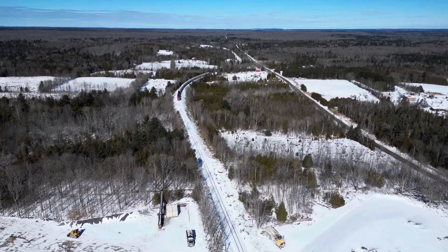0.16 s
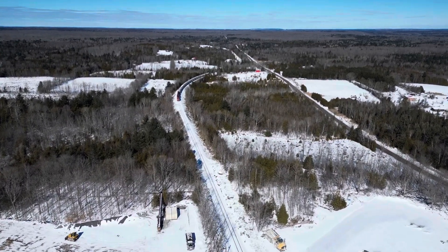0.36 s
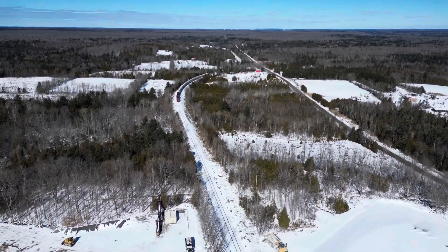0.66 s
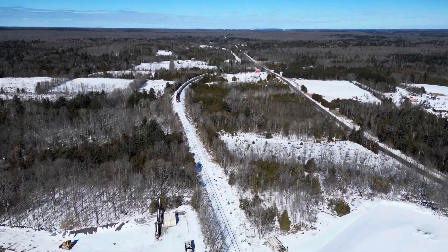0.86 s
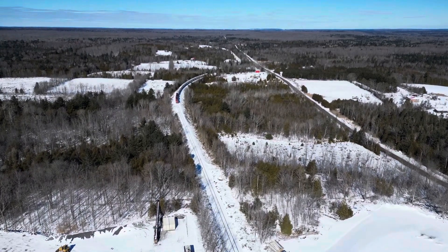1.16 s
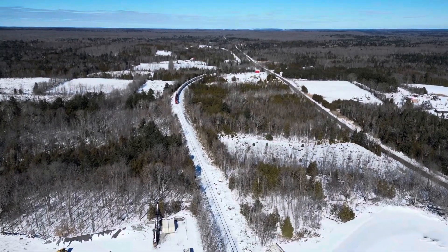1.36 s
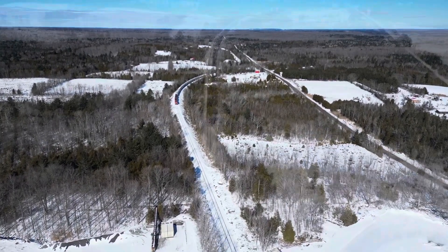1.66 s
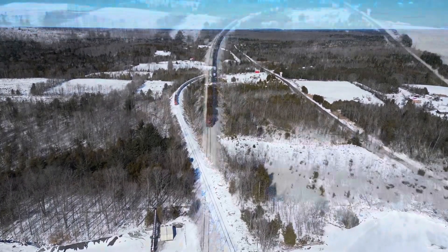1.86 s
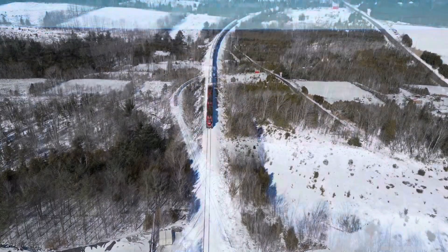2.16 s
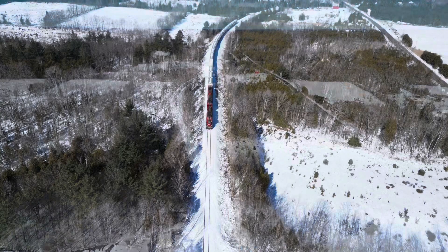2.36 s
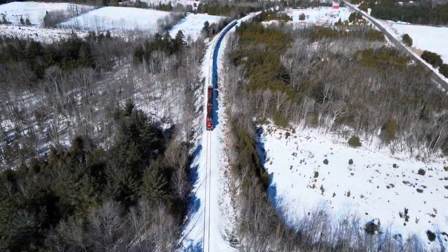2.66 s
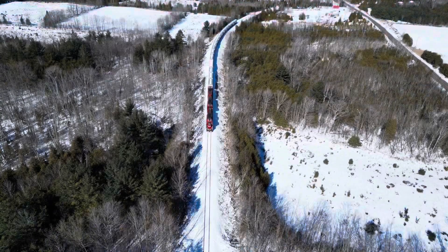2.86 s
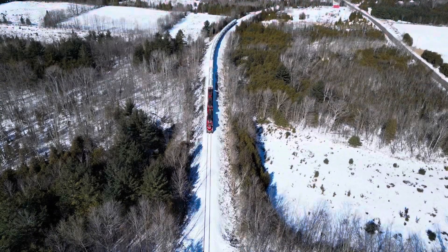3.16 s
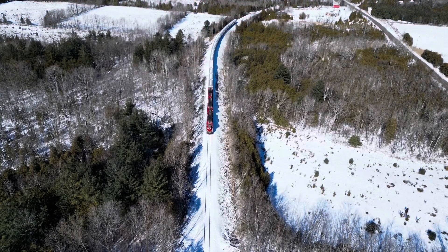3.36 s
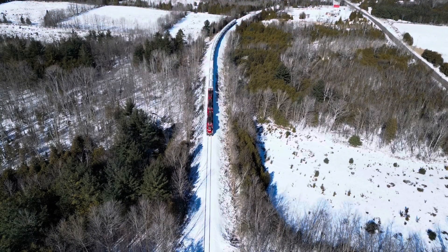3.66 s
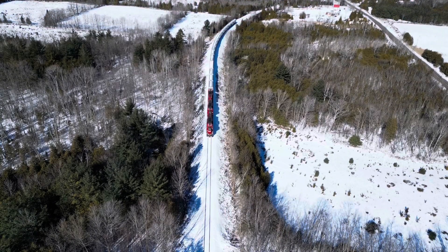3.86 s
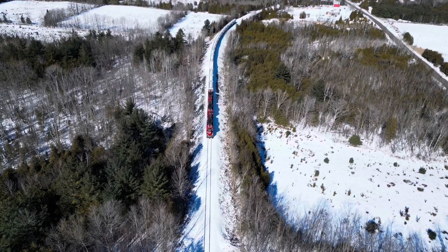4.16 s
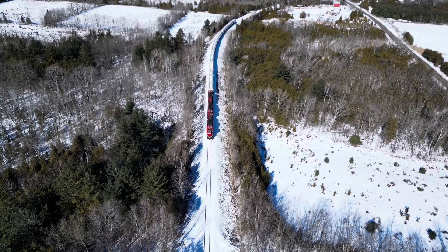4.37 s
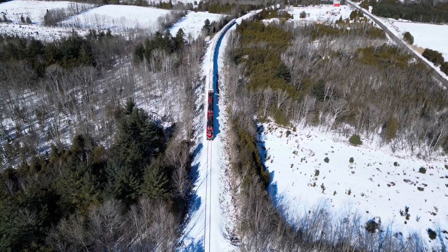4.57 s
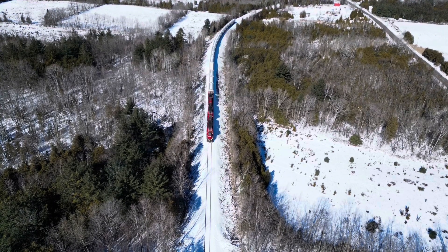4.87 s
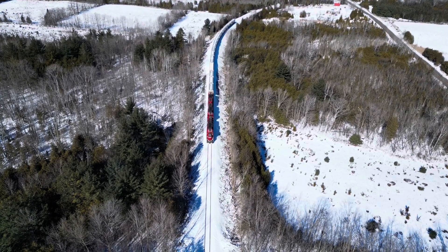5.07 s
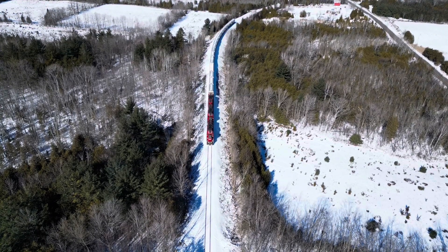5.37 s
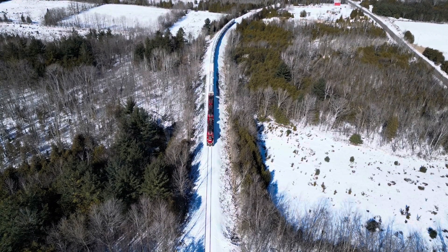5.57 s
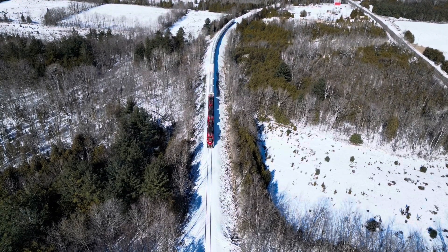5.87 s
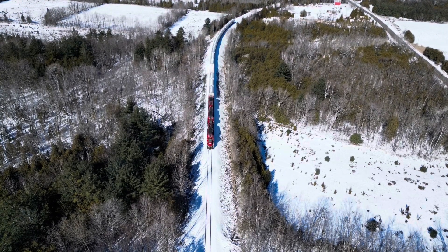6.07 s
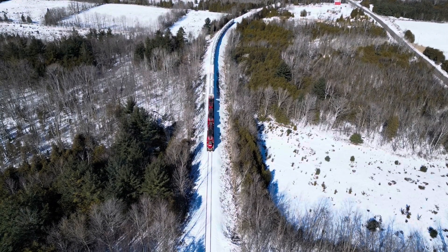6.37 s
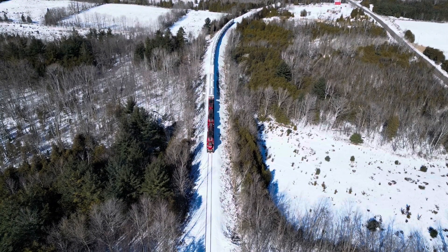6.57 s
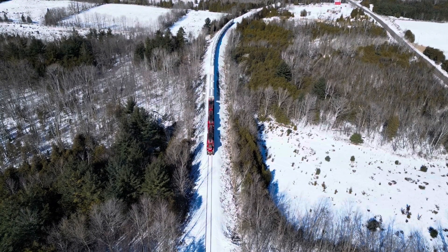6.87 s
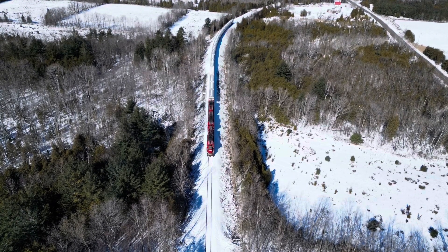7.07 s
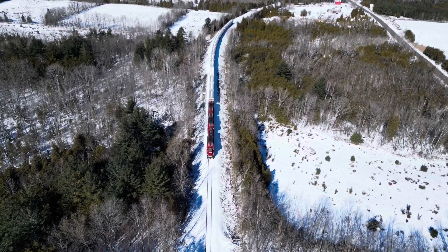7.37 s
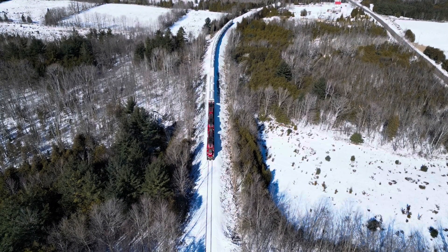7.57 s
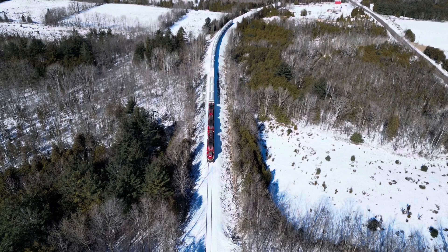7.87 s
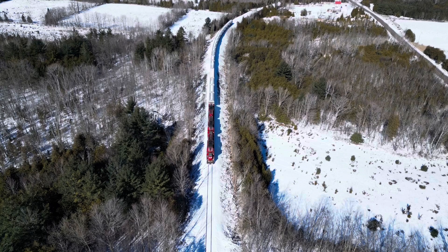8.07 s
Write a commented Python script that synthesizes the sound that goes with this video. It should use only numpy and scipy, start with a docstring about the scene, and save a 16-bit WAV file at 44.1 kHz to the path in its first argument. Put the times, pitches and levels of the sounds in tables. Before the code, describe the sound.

A low diesel engine boom beats quickly and steadily, about fifteen pulses a second, distant and dark under light wind buffeting. A smooth cross-fade near two seconds brings the locomotive closer, louder and brighter, with roar, faint tonal hums, broad hiss and sparse crackling ticks. Gusts flutter low against the stereo microphone mid-way; the engine turns very slightly faster after six seconds, then settles back.

```python
"""A diesel locomotive hauls along a snowy forest track: far off at first, near after a cross-fade at 2 s.
Two neighbouring crankshaft orders, as sines, beat once a turn; near, a second, slower engine beats with them.
Wavering tones make the hums, filtered noise the roar and hiss, low noise and short blows the wind on two ports.
Sparse ticks grow denser once near; gusts and a puff of air peak about 4.4 s; the engine turns slightly
faster from 6 s to 7.5 s, while the hums wander wider; from 7.6 s the low hums sink."""
import sys
import numpy as np
from scipy import signal
from scipy.io import wavfile
from scipy.ndimage import uniform_filter1d

SR = 44100
rng = np.random.default_rng(int(sys.argv[2]) if len(sys.argv) > 2 else 0)


def wrap_up_sound(samples):
    """Save the sound to the file named by the first command line argument, as 16-bit audio."""
    columns = np.atleast_2d(samples).T
    # keep every value between -1 and 1, then stretch to whole-number steps
    tamed = np.clip(columns, -1, 1)
    steps = np.round(tamed * 32767).astype(np.int16)
    wavfile.write(sys.argv[1], SR, steps)


N = 362061
T = np.arange(N) / SR
OPPOSITE = np.array([[1], [-1]])  # opposite signs in the left and right channels

# crankshaft speed, far and near: start_s, speed_turns_per_s
SHAFT_FAR = [(0, 15.29), (8.21, 15.29)]
SHAFT_NEAR = [(0, 15.3), (2.2, 15.26), (2.8, 15.33), (5.9, 15.33), (6.2, 15.41), (7.4, 15.42),
              (7.55, 15.32), (8.21, 15.32)]


def boom():
    """Interference at the ears: path delays and an opposed late copy set the boom's place in the stereo field."""
    first = 2 * np.pi * rng.random(2)  # phases of order 9: far, near
    lead_far_turns, lead_near_turns = .39, .77  # lead of order 10 over order 9, which places the throb
    throb = first + 2 * np.pi * np.array([lead_far_turns, lead_near_turns])
    out = strong_orders(first, throb) + order_13() + weak_orders(first, throb) + second_engine()
    left, right = pan(out, -1.2)
    ground = undb(-21.5) * late(out, count=80)  # a late copy off the ground
    return np.array([left, late(right, count=1)]) + ground * OPPOSITE


def strong_orders(first, throb):
    """Beating: two neighbouring harmonics of the shaft reinforce each other once a turn."""
    # the two strong orders as the air carries them: time_s, order_9_db, order_10_db
    boom_levels = [(0, -49, -44), (.25, -49, -50), (.48, -46, -48), (.82, -55, -50), (.98, -45, -48.5),
                   (1.32, -46, -49), (1.55, -42.5, -52), (1.81, -41.5, -66), (2.0, -43.5, -47),
                   (2.3, -42, -40.5), (2.58, -36, -38.5), (3.0, -36.5, -39), (3.35, -35, -39.5),
                   (3.85, -38, -40), (4.16, -37.5, -39.5), (4.76, -37, -36), (5.69, -36, -38.5),
                   (5.99, -38, -39.5), (6.3, -35.5, -43), (6.55, -36, -42), (6.9, -38, -42),
                   (7.16, -36, -38), (7.29, -40, -40), (7.5, -37.5, -36.5), (7.75, -39, -37.5),
                   (7.98, -36.5, -38.5), (8.21, -44, -41.5)]
    db9, db10 = curves(boom_levels, T)
    waver9, waver10 = .5 * walk(5, count=2)
    return undb(db9 + waver9) * shaft_order(9, first) + undb(db10 + waver10) * shaft_order(10, throb)


def order_13():
    """Harmonic of the shaft with slow amplitude modulation, decaying exponentially late on."""
    far_db, near_db, waver_db = -59, -49.5, 1.5
    fades_s, fade_db_per_s = 6.0, -4
    change_db = waver_db * walk(5)[0] + fade_db_per_s * np.maximum(T - fades_s, 0)
    start = 2 * np.pi * rng.random(2)
    return fade(far_db, near_db, nearness(T)) * undb(change_db) * shaft_order(13, start)


def weak_orders(first, throb):
    """Harmonic series of the shaft: each weak order wavers in level as the air path shifts."""
    # weaker orders: multiple_of_shaft_turn, far_db, near_db
    orders = [(5, -53, -57), (6, -54, -63), (7, -51, -58), (8, -66, -52), (11, -70, -57), (12, -71, -62),
              (14, -72, -69), (15, -71, -67), (16, -72, -63.5), (17, -76, -69), (18, -76, -62.5),
              (19, -77, -63.5), (20, -79, -69), (21, -70, -66.5), (22, -70, -65.5)]
    # orders that near keep step with the throb
    locked_orders = (8, 11)
    lock_lag = .14  # share of the order's own cycle
    near, out = nearness(T), 0
    for (k, far_db, near_db), w in zip(orders, walk(5, count=len(orders))):
        start = 2 * np.pi * rng.random(2)
        if k in locked_orders:
            locked = first + (k - 9) * (throb - first) - 2 * np.pi * lock_lag
            start[1] = locked[1]
        swell_db = tone_swell_db(k * SHAFT_FAR[0][1]) if k > 13.5 else 0
        waver_db = (1.8 if k < 12.5 else 2.2) * w
        level_db = far_db + near * (near_db + swell_db - far_db) + waver_db
        out = out + undb(level_db) * shaft_order(k, start)
    return out


def second_engine():
    """Beating of detuned sources: a slightly slower engine down the train, heard only near."""
    # its crankshaft speed: time_s, speed_turns_per_s
    second_shaft = [(0, 14.85), (4.5, 14.85), (6.2, 14.92), (8.21, 14.94)]
    # its orders: multiple_of_shaft_turn, near_db
    second_orders = [(9, -58), (10, -56)]
    turn, out = turn_angle(second_shaft), 0
    for (k, db), w in zip(second_orders, walk(3, count=2)):
        tone = np.sqrt(2) * np.cos(k * turn + 2 * np.pi * rng.random())
        out = out + nearness(T) * undb(db + 2.5 * w) * tone
    return out


def turn_angle(shaft):
    """Phase is the time integral of speed, in radians."""
    return 2 * np.pi * np.cumsum(curves(shaft, T)[0]) / SR


def shaft_order(k, start):
    """Phasor sum of the far and near harmonic k, held near rms 1 through the cross-fade."""
    near = nearness(T)
    far_phasor = np.sqrt(1 - near) * np.exp(1j * (k * turn_angle(SHAFT_FAR) + start[0]))
    near_phasor = np.sqrt(near) * np.exp(1j * (k * turn_angle(SHAFT_NEAR) + start[1]))
    both = far_phasor + near_phasor
    return np.sqrt(2) * both.real / np.maximum(abs(both), .3)


def hums():
    """Resonance and tone: body, gear and fan hums are wandering sines within narrow-band noise."""
    # centre of each hum: pitch_hz
    hum_hz = (243, 346, 400, 465, 484, 598, 613, 630, 684, 710, 727, 745, 885, 931, 968, 1028, 1211, 1457,
              3568, 9463, 9755)
    # one row for each hum: width_hz, far_db, near_db, left_minus_right_db
    hum_rows = [(8, -78, -62, 3), (6, -85, -68, 0), (8, -82, -72, 0), (12, -82, -69.5, 0.5),
                (8, -84, -67, -1), (6, -77, -75, -8), (6, -95, -74, 0), (6, -95, -75, 0),
                (6, -97, -72, -0.5), (14, -95, -73, 0), (10, -85, -68.5, 2), (4, -82, -66, 1.5),
                (6, -100, -81, 0), (8, -101, -73.5, 0), (12, -99, -79, 0), (10, -100, -81.5, 0),
                (8, -102, -86, 2), (14, -104, -88, 3), (8, -108, -104, -1), (10, -105, -94, 0),
                (10, -103, -95, 0)]
    clean_db, rough_db, waver_db = -3.5, -6.5, 2.8  # clear core, noise around it, waver of the core
    loosens_s, loose = 6.0, 2.5  # pitch wanders this many times wider once the engine changes speed
    sags_s, sag_per_s = 7.6, .02  # the low hums sink, share of their pitch per s
    near, out = nearness(T), 0
    wander = 1 + (loose - 1) * np.clip((T - loosens_s) / .4, 0, 1)
    sag = 1 - sag_per_s * np.maximum(T - sags_s, 0)
    drift, waver = walk(7, count=len(hum_rows)), walk(9, count=len(hum_rows))
    for hz, (width, far_db, near_db, pan_db), d, w in zip(hum_hz, hum_rows, drift, waver):
        pitch = hz * (sag if hz < 1000 else 1) + width / 3 * wander * d
        cycles = np.cumsum(pitch) / SR + rng.random()
        core = np.sqrt(2) * undb(waver_db * w) * np.cos(2 * np.pi * cycles)
        rough = band(hz - .7 * width, hz + .7 * width)
        tone = undb(clean_db) * core + undb(rough_db) * rough
        apart = band(hz - width / 2, hz + width / 2, order=1) if hz < 6000 else 0
        stereo = pan(tone, pan_db) + undb(-14) * apart * OPPOSITE
        out = out + fade(far_db, near_db + tone_swell_db(hz), near) * stereo
    return out


def hollow_hiss():
    """Band-pass filtering of noise gives a hollow hiss, leaning left."""
    # the band: low_hz, high_hz, far_db, near_db, left_minus_right_db
    hollow = (1780, 2030, -84, -88, 14)
    lo_hz, hi_hz, far_db, near_db, pan_db = hollow
    return fade(far_db, near_db, nearness(T)) * pan(band(lo_hz, hi_hz), pan_db)


def roar():
    """Spectral shaping: exhaust roar is noise whose regions swell one by one."""
    # spectra, far and near: frequency_hz, density_db_per_hz
    roar_far = [(110, -81), (165, -82), (205, -78), (260, -83), (345, -88), (520, -91), (700, -101),
                (1000, -114), (1400, -118), (1700, -116), (2000, -119), (2200, -123), (2600, -128),
                (3400, -140)]
    roar_near = [(110, -74), (180, -73), (310, -77), (348, -77.5), (375, -85.5), (410, -85.5), (455, -83.5),
                 (560, -82.5), (650, -87), (780, -88), (860, -90.5), (1000, -95.5), (1100, -101.5),
                 (1300, -106.5), (1950, -107), (2200, -113), (2900, -115), (3400, -132)]
    # level change of five regions: time_s, then one db column for each region
    swell = [(0, -1, -2, -1, -3, .6), (1.0, -1.5, 1, 0, -3, .4), (1.6, 0, 3, 0, 0, .4),
             (1.9, 1, 2, -2, 3, 0), (2.25, -1, 2, -2.5, 2, 0), (2.6, 0, 0, 3, 1, .6),
             (3.3, .5, 2, 3, 1, .6), (4, 2.5, 1, 0, 0, .8), (5, -1.5, -1, -3.5, -1, 2),
             (5.8, -3.5, 0, -2, -1, 0), (7, -3, -.5, -1, 0, 0), (7.5, -2, 0, 1, 1, 1.5),
             (8.21, -3, 1, 1.5, 0, 0)]
    # their centres: frequency_hz
    swell_hz = (280, 470, 700, 950, 1600)
    per_hz = np.sqrt(SR / 2)  # white noise of rms 1 spreads its power over SR / 2 Hz
    return per_hz * spread_noise(roar_far, roar_near, swell_hz, lambda t: curves(swell, t),
                                 flicker_db=.9, common_db=.47)


def hiss():
    """Spectral shaping: fan hiss is noise under one level curve for all its bands."""
    # colour, far and near: frequency_hz, relative_db
    hiss_far = [(1470, -37), (2500, -19), (3610, -8), (5370, -3), (7390, -2), (9020, -5), (9810, -11),
                (11600, -7), (15500, -13)]
    hiss_near = [(1470, -16), (2500, -6.5), (2850, -7.5), (3450, -7), (4000, -3.5), (5250, .5), (6060, -5),
                 (8360, 1.5), (9440, -2.5), (10200, -10), (10800, 1), (11300, -.5), (15500, -10.5)]
    # level added to the colour: time_s, level_db
    loud = [(0, -81.5), (1.6, -82), (1.95, -69.5), (2.2, -69), (2.6, -67), (3.2, -68.3), (4.4, -67.8),
            (5.6, -70), (6.0, -70), (6.35, -69.3), (6.8, -70.5), (8.21, -71.5)]

    def same_level(t):
        level_db = curves(loud, t)[0]
        return [level_db, level_db]  # one row for each pivot frequency

    return spread_noise(hiss_far, hiss_near, (5500, 7000), same_level, flicker_db=1.0, common_db=.9)


def spread_noise(far, near, pivots_hz, swell, flicker_db, common_db):
    """Short-time Fourier shaping of mid and side noise; bands flicker alone and together."""
    # side level relative to mid, far and near; nearly mono above about 6.5 kHz: frequency_hz, side_minus_mid_db
    side_far = [(110, -12), (200, -16), (380, -12), (700, -4), (1290, -2), (2380, 1), (4400, -1),
                (6300, -5), (7200, -18), (15000, -20)]
    side_near = [(110, -18), (200, -16), (380, -13), (700, -8), (1290, -3), (2380, -1), (4400, -2),
                 (6200, -4), (6900, -25), (15000, -28)]
    # lean, far and near: frequency_hz, left_minus_right_db
    tilt_far = [(200, -1), (700, -1), (1290, 5), (2380, 8), (4400, 4), (6300, 2), (7200, 0), (15000, 0)]
    tilt_near = [(200, -1), (700, -1), (1290, 1), (2380, 4), (4400, 3), (6100, 2), (6500, 0), (15000, 0)]
    noise = rng.standard_normal((2, N + 4096))
    hz, t, (mid, side) = signal.stft(noise, SR, nperseg=2048)
    share, log_hz = nearness(t), np.log(hz + 1)

    def along(points_hz, rows):
        return np.array([np.interp(log_hz, np.log(points_hz), r) for r in np.transpose(rows)]).T

    def spectrum(rows):
        return along(np.array(rows)[:, 0], np.array(rows)[:, 1:])

    def field(a, b):
        return spectrum(a) + np.sqrt(share) * (spectrum(b) - spectrum(a))

    inside = (hz > far[0][0]) & (hz < 1.15 * far[-1][0])
    flicker = walk(12, count=12)[:, np.minimum((t * SR).astype(int), N - 1)]
    flicker_bands_hz = np.geomspace(100, 16000, 12)
    colour_db = along(pivots_hz, swell(t)) + flicker_db * along(flicker_bands_hz, flicker)
    side_ratio = undb(field(side_far, side_near))
    tilt = np.tanh(field(tilt_far, tilt_near) * np.log(10) / 40)
    # the side signal holds a copy of the mid (a lean to one channel) and an unrelated rest
    side = tilt * mid + np.sqrt(np.maximum(side_ratio ** 2 - tilt ** 2, 0)) * side
    gain = inside[:, None] * fade(spectrum(far), spectrum(near), share) * undb(colour_db)
    stereo = signal.istft(gain * np.array([mid + side, mid - side]), SR, nperseg=2048)[1]
    return stereo[:, :N] * undb(common_db * walk(28)[0])


def ticks():
    """Impulsive excitation: dry noise cracks with a short thin ring, and fainter ones once near."""
    # small dry ticks: start_s, level_db, crack_hz
    tick_rows = [(0.0348, -77, 7340), (0.2555, -72, 7000), (1.5618, -76, 6200), (2.0961, -66, 11600),
                 (2.3794, -68, 5040), (2.4394, -64, 5200), (2.9072, -67, 5300), (4.127, -65, 8540),
                 (4.4083, -62, 5240), (4.5979, -63, 5250), (4.9694, -66, 4120), (5.1794, -67, 4230),
                 (5.5494, -66, 4900), (6.0182, -64, 11000), (6.1809, -61, 5180), (6.2605, -68, 12000),
                 (6.2816, -63, 7000), (6.287, -67, 12000), (6.47, -66, 4560), (6.5444, -63, 5000),
                 (6.6892, -61, 5600), (6.983, -66, 4840), (7.4294, -63, 5010)]
    crack_near_s, far_smear = .003, 2.6  # decay time near; far cracks last this many times longer
    ring_hz, ring_s, ring_db, crack_q = 5150, .013, -13, 2.2
    out, t = np.zeros(N + 3000), np.arange(3000) / SR
    chance = rng.random((60, 3))
    faint = [(2.2 + 6 * a, -76 + 6 * b, 4500 + 7000 * c) for a, b, c in chance]
    broad, thin = band(4300, 15000), band(ring_hz - 250, ring_hz + 250)
    rise = 1 - np.exp(-t / .0006)
    for s, db, hz in list(tick_rows) + faint:
        at = min(int(s * SR), N - len(t))
        span = slice(at, at + len(t))
        crack_s = crack_near_s * (far_smear + nearness(s) * (1 - far_smear))
        grain = broad[span]
        crack = .8 * signal.lfilter(*signal.iirpeak(hz, crack_q, SR), grain) + .45 * grain
        ring = undb(ring_db) * thin[span] * np.exp(-t / ring_s)
        out[span] += undb(db) * rise * (crack * np.exp(-t / crack_s) + ring)
    return pan(out[:N], 2)


def puff():
    """Amplitude modulation: a bell-shaped envelope on band noise gives a puff of air."""
    # the puff: middle_s, half_length_s, low_hz, high_hz, level_db
    puff_row = (4.4, .11, 4100, 6800, -74)
    s, half, lo_hz, hi_hz, db = puff_row
    return pan(undb(db) * np.exp(-((T - s) / half) ** 2) * band(lo_hz, hi_hz), 5)


def wind():
    """Turbulent pressure: low noise at the ports; stronger gusts reach both higher and deeper."""
    flutter_db = -24  # against the differing rumble, near
    near = nearness(T)
    shared_gain, apart_gain = gusts()
    reach = undb(-18 + 6.5 * near) * np.sqrt(shared_gain / undb(-40.5))
    depth = undb(-19 + 10.5 * near) * (apart_gain / undb(-50)) ** .4
    rumble = undb(1.5 * walk(30)[0]) * steady(band(52, 112), .16)
    shared = shared_gain * (rumble + reach * band(100, 230) + depth * band(33, 60)) + blows()
    flutter = near * apart_gain * undb(flutter_db + 2.4 * walk(43)[0]) * band(110, 330)
    apart = apart_gain * steady(band(42, 120), .14) + flutter
    return shared + apart * OPPOSITE


def blows():
    """Pressure pulses: each blow of wind on the ports is a brief cosine under a Gaussian envelope."""
    # single blows: middle_s, envelope_peak_db, pitch_hz
    blow_rows = [(0.095, -32, 66), (0.608, -29, 86), (0.926, -34, 78), (1.012, -37, 86), (1.18, -36, 91),
                 (1.313, -37, 79), (1.582, -40, 88), (3.706, -44, 78), (4.305, -34, 76), (4.393, -24, 76),
                 (4.439, -26, 75), (4.672, -37, 58), (4.753, -34, 81), (4.811, -28, 82), (4.879, -28, 89),
                 (4.919, -30, 63), (4.951, -31, 74), (5.011, -31, 77), (5.088, -30, 63), (5.188, -27, 75),
                 (5.22, -35, 77), (5.265, -31, 65), (5.288, -30, 94), (5.357, -31, 52), (5.56, -30, 70),
                 (5.648, -33, 69), (5.712, -33, 58), (5.76, -36, 52), (6.3, -44, 47), (6.384, -38, 74),
                 (6.471, -35, 73), (6.558, -33, 80), (6.595, -36, 84), (6.75, -35, 90), (6.78, -33, 58),
                 (6.816, -31, 62), (6.916, -26, 66), (6.942, -35, 72), (6.998, -28.5, 92), (7.719, -35, 76),
                 (7.975, -35, 62), (8.009, -35, 69), (8.063, -36, 70), (8.125, -36, 69)]
    half_cycles = .75  # cycles from the middle until the envelope falls to 1/e
    out, t = np.zeros(N), np.arange(-1500, 3000) / SR
    for s, db, hz in blow_rows:
        at = int(s * SR) - 1500
        bell = np.exp(-(t * hz / half_cycles) ** 2)
        out[at:at + len(t)] += undb(db) * bell * np.cos(2 * np.pi * (hz * t + rng.random()))
    return out


def gusts():
    """Power addition: gains of shared and differing rumble, a calm bed plus bell-shaped gusts."""
    # gusts: middle_s, half_length_s, shared_db, differing_db
    gust_rows = [(0, .08, -50, -47), (.7, .12, -50, -49), (1.0, .08, -58, -47), (1.27, .08, -60, -54),
                 (1.56, .08, -58, -56), (2.1, .15, -56, -60), (3.77, .07, -52, -54), (4.15, .12, -55, -53),
                 (4.4, .1, -41, -52), (4.67, .07, -48, -47), (4.9, .2, -42, -44), (5.3, .15, -43, -44),
                 (5.63, .1, -44.5, -56), (5.8, .1, -46, -58), (6.08, .08, -53, -56), (6.4, .15, -48, -56),
                 (6.89, .15, -44, -42), (7.2, .15, -53, -60), (7.73, .1, -47, -48), (8.01, .09, -48, -54),
                 (8.19, .06, -42, -49)]
    calm_shared_db, calm_apart_db = (-46, -56), (-61.5, -74)  # far, near
    s, half, shared_db, apart_db = np.transpose(gust_rows)[:, :, None]
    bell, near = np.exp(-((T - s) / half) ** 2), nearness(T)
    gains = []
    for calm, peak_db, w in zip((calm_shared_db, calm_apart_db), (shared_db, apart_db), walk(8, count=2)):
        blown_power = np.sum((undb(peak_db) * bell) ** 2, axis=0)
        bed = fade(*calm, near) * undb(1.5 * w)
        gains.append(np.sqrt(bed ** 2 + blown_power))
    return gains


def tone_swell_db(hz):
    """Frequency-dependent gain: slow swell of a near tone, none from the last pivot upward."""
    # level change of near hums and weak orders: time_s, then one db column for each of seven regions
    tone_swell = [(1.6, 0, 0, 0, 2, 0, -4, 5), (2.25, -1, 0, -2, -1, -1, -7, 2),
                  (2.75, 3, 1, 0, -3, 3, 3, 2), (3.3, 3, 0, -2, 1, 3, 3, 0), (3.75, 2, 3, 0, 3, 0, 3, 1),
                  (4.25, 1, 5, -1, 3, -5, -1, -4), (4.75, -3, 1, -4, -2, -2, -2, -3),
                  (5.25, 0, -2, 1, 1, -1, -1, 1), (5.75, -3, -7, 2, 1, -1, -3, -2),
                  (6.25, -5, -4, 6.5, 0, -3, -1, -1), (6.75, -6, -4, 1, 0, 0, -1, -2),
                  (7.25, -6, 0, -3, 1, -2, 0, 2), (8.21, -5, -2, 4, 3, -1, 2, 1)]
    # region centres, then the pivot of no swell: frequency_hz
    tone_swell_hz = (243, 285, 330, 475, 600, 735, 940, 1200)
    s, *regions = np.transpose(tone_swell)
    at_hz = [np.interp(hz, tone_swell_hz, np.append(row, 0)) for row in np.transpose(regions)]
    return np.interp(T, s, at_hz)


def nearness(t):
    """Linear cross-fade: 0 while the train is heard from far off, 1 once it is near."""
    # cross-fade: start_s, end_s
    fade_s = (1.7, 2.4)
    return np.clip((t - fade_s[0]) / (fade_s[1] - fade_s[0]), 0, 1)


def fade(far_db, near_db, near):
    """Incoherent addition: far and near sound add as powers during the cross-fade."""
    return np.sqrt((1 - near) ** 2 * undb(2 * far_db) + near ** 2 * undb(2 * near_db))


def walk(rate, count=1):
    """Low-pass randomness: random steps, rate per second, smoothed twice to a spread near 1."""
    k = int(SR / rate)
    hold = k // 50  # coarse points in one step
    steps = np.repeat(rng.standard_normal((count, N // k + 2)), hold, axis=1)
    slow = 1.37 * uniform_filter1d(uniform_filter1d(steps, hold), hold)
    coarse_s = np.arange(slow.shape[1]) * k / hold / SR
    return np.array([np.interp(T, coarse_s, w) for w in slow])


def band(lo_hz, hi_hz, order=2):
    """Band-pass filtering of white noise, scaled to rms 1."""
    sos = signal.butter(order, [lo_hz, hi_hz], "band", fs=SR, output="sos")
    return unit(signal.sosfilt(sos, rng.standard_normal(N)))


def steady(x, span_s):
    """Automatic gain: evens out the chance swells of a noise that last longer than span_s."""
    return x / np.sqrt(uniform_filter1d(x ** 2, int(span_s * SR)) + 1e-3)


def late(x, count):
    """Propagation delay by count samples."""
    return np.append(np.zeros(count), x[:-count])


def pan(x, db):
    """Level difference between channels: left minus right in dB."""
    return x * undb(np.array([[db], [-db]]) / 2)


def undb(db):
    """Decibels to amplitude ratio."""
    return 10 ** (np.asarray(db) / 20)


def unit(x):
    """Normalisation to rms 1."""
    return x / np.sqrt(np.mean(x ** 2))


def curves(table, t):
    """Linear interpolation of each column over the first, time."""
    s, *columns = np.transpose(table)
    return [np.interp(t, s, c) for c in columns]


def scene():
    """Superposition of all sources in the two channels."""
    engine = boom() + hums() + hollow_hiss() + roar() + hiss()
    return engine + ticks() + puff() + wind()


def record(dry):
    """Low-pass filtering: the recorder cuts the top."""
    top_hz = 15450
    return signal.sosfilt(signal.ellip(10, .2, 80, top_hz, fs=SR, output="sos"), dry)


dry = scene()
out = record(dry)
wrap_up_sound(out)
```